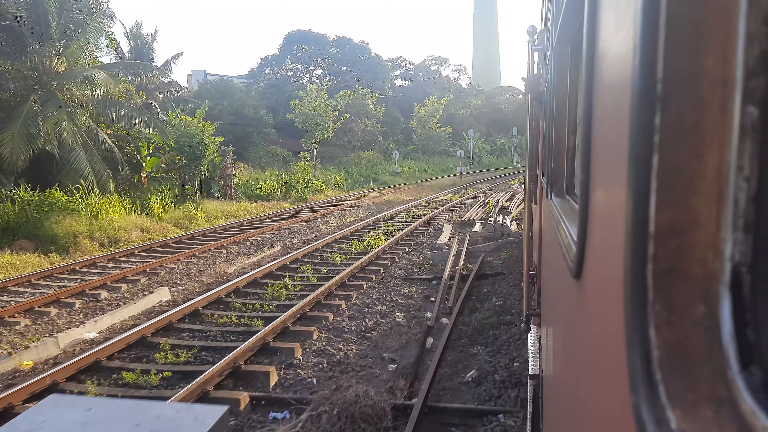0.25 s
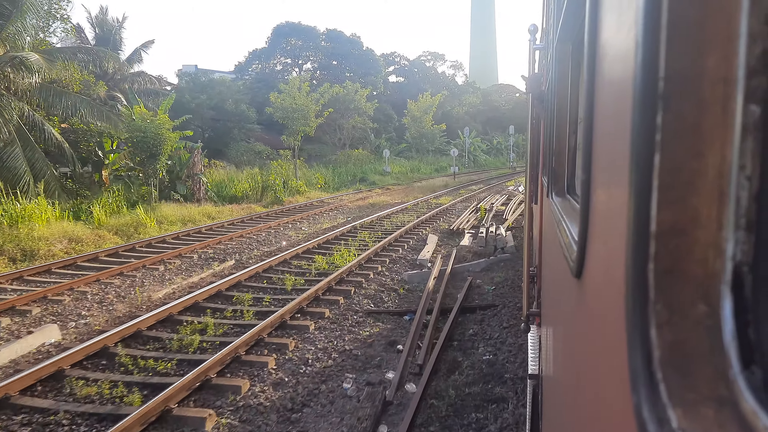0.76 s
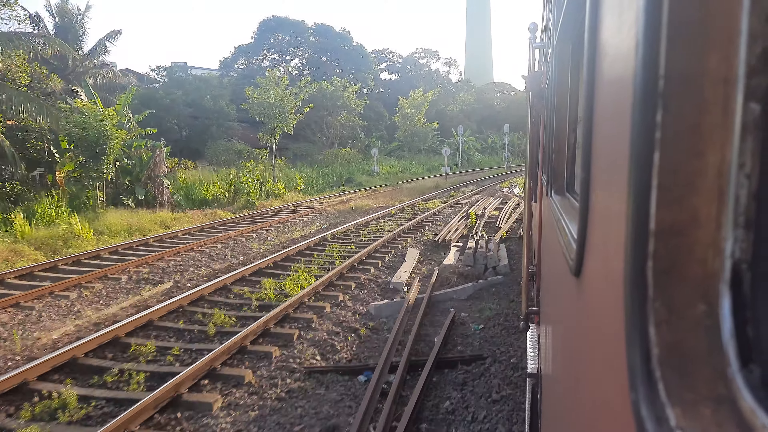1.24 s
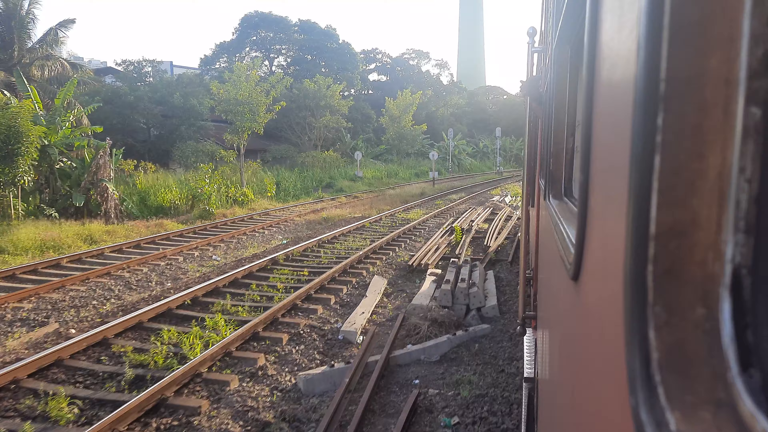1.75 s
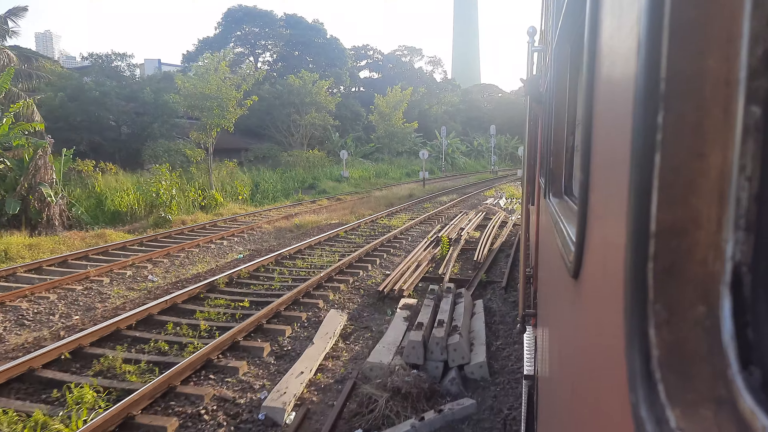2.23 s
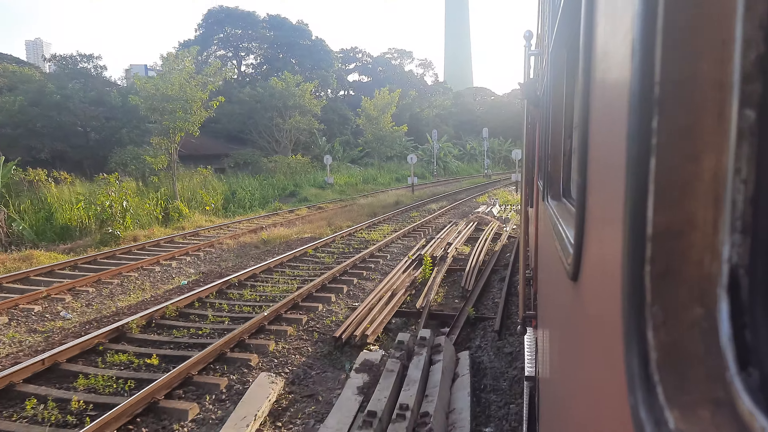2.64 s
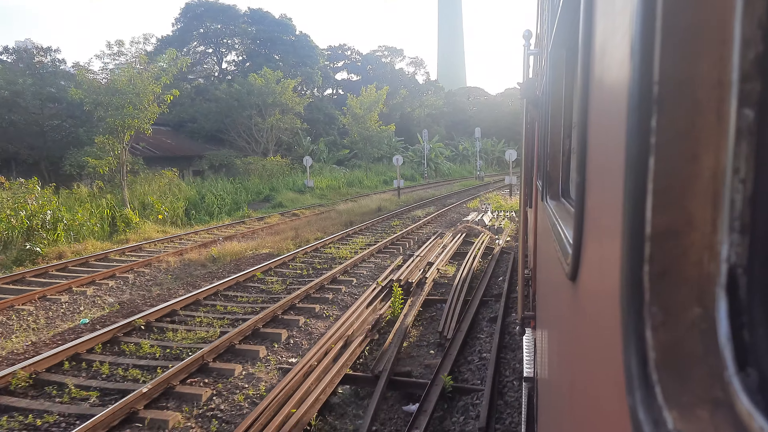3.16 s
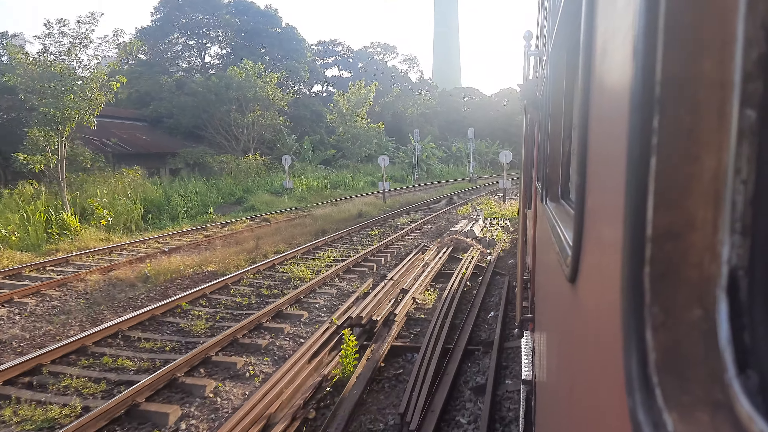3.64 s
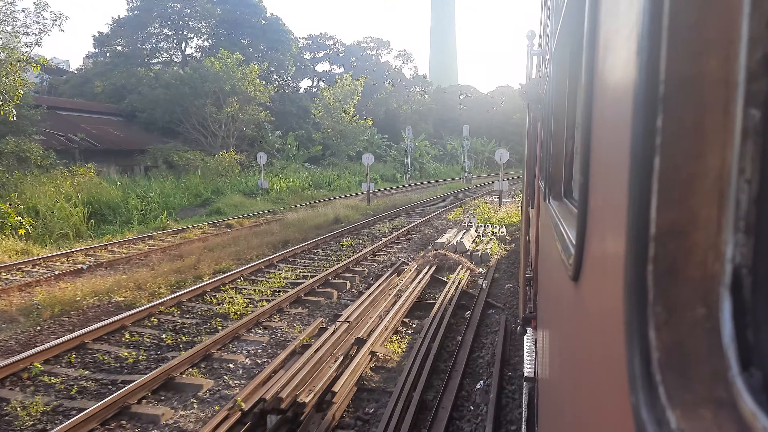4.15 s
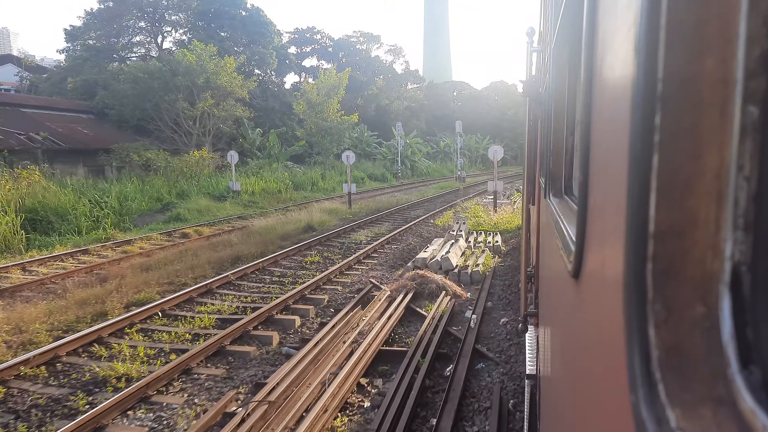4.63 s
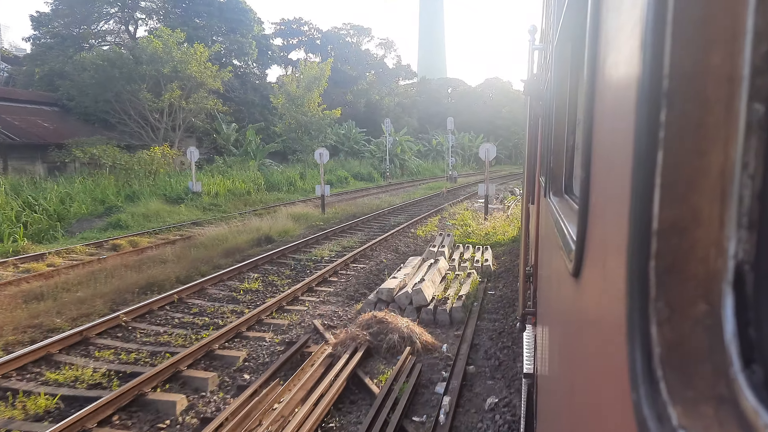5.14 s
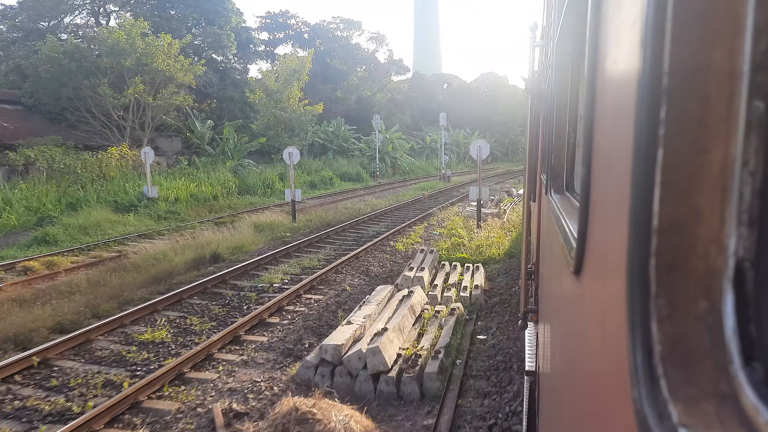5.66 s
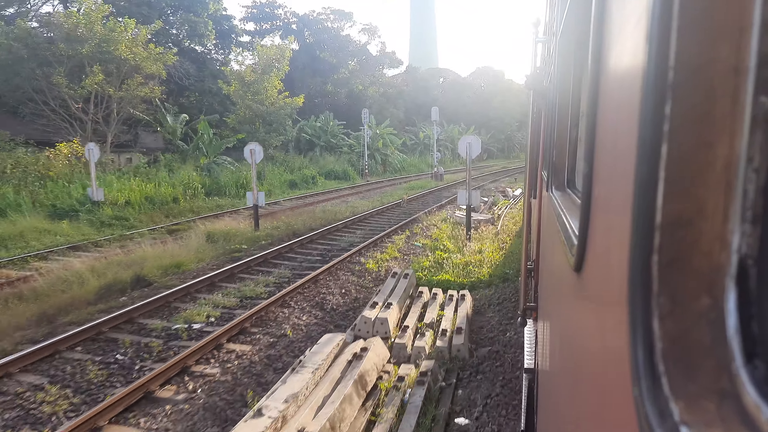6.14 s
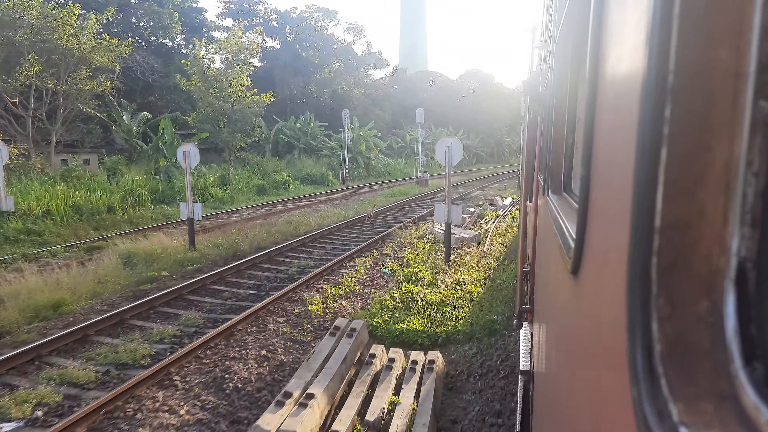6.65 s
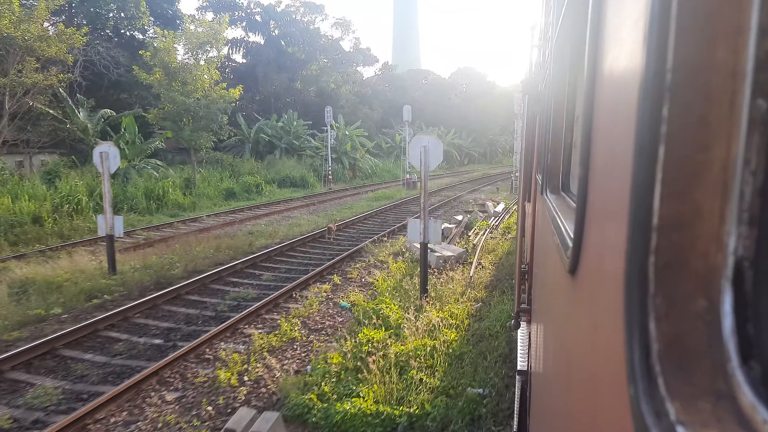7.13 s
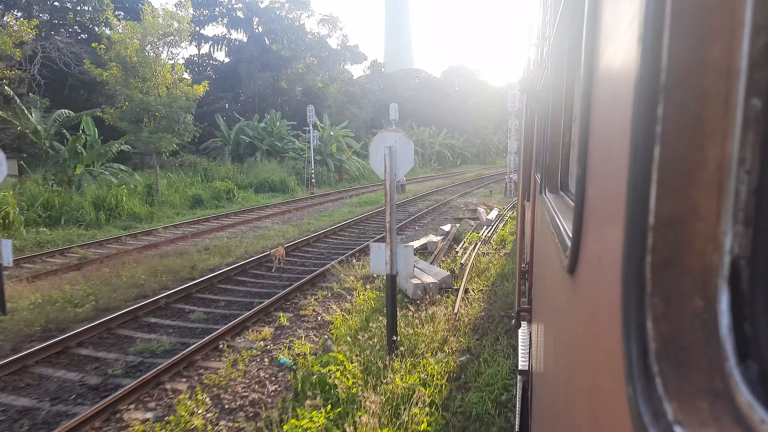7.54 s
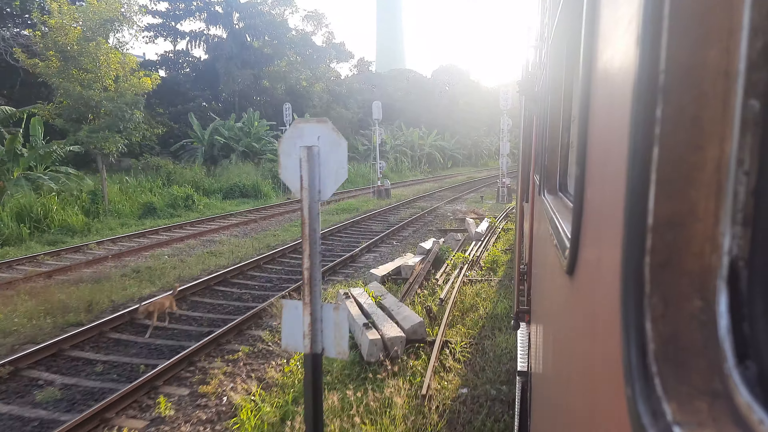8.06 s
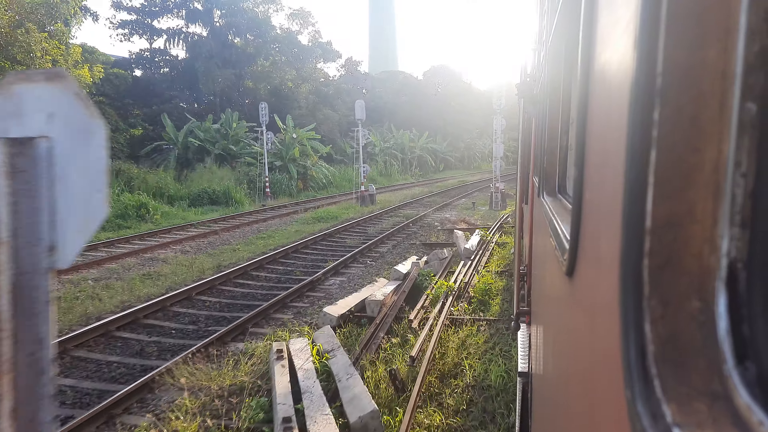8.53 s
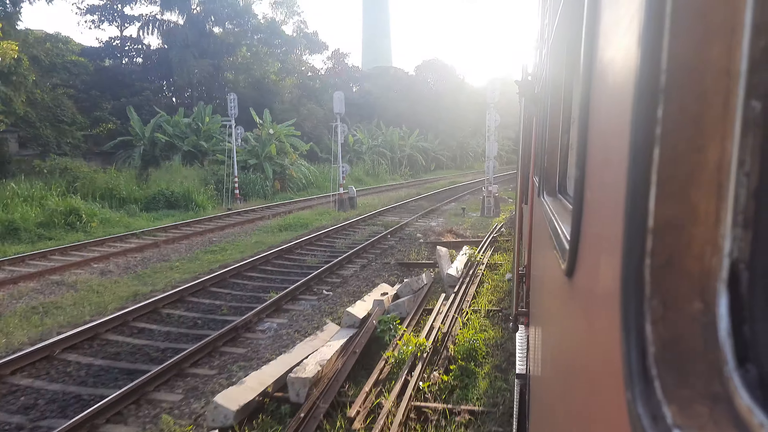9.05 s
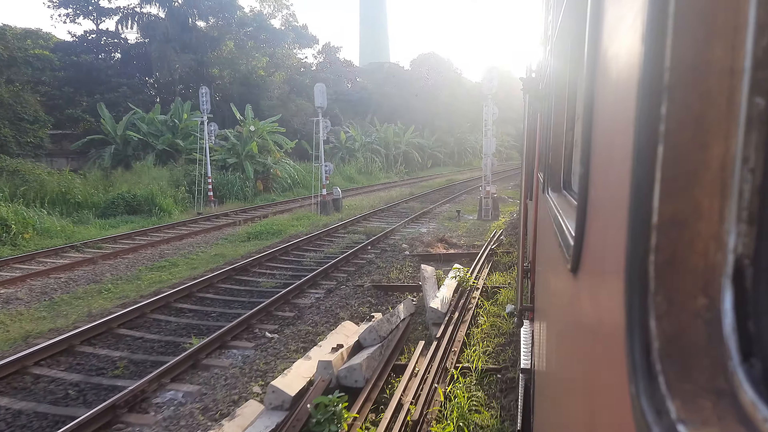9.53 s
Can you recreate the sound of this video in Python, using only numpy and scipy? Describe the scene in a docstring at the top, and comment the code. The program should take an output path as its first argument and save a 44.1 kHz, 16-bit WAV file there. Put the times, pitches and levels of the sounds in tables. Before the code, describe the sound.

A passenger train rolls slowly over jointed rails, heard closely from an open carriage door, outdoors in wide stereo. At 0 s the tail of a horn dies away over rough low rumble and faint steady far-wheel hiss. Dull, short, damped knocks come irregularly throughout, strong around 0.7 and 0.9 s, with small bursts of flange scraping. From about 2.5 to 3.7 s a wheel rubs continuously, a bright, gritty, ringing metallic hiss, while the rumble eases. Shorter scrapes and thin singing tones follow from 4.3 to 5.7 s. Heavy knocks gather between 5.2 and 7.4 s; around 6.6 to 6.9 s a coupling creaks in three wavering pulses. Flange hiss swells again at 7.7 s, and a mid-pitched, slightly wavering horn ahead blows from 7.8 to 8.2 s, then fades. Knocks, light rasping and a strengthening rumble continue until the cut at about 9.8 s.

```python
"""A passenger train rolls slowly over jointed rails and points, heard from an open carriage door.
The carriage is rumbling filtered noise, and each joint adds a short damped knock. Wheel flanges rub
the rail: noise rings the wheel modes in bursts of hiss. Single modes sing out as narrow noise tones.
A coupling creaks in wavering partials, and so does the horn ahead: first the tail of one blast,
later a whole one. The far wheels hiss steadily behind it all."""
import sys
import numpy as np
from scipy import signal
from scipy.fft import rfft, irfft
from scipy.io import wavfile
from scipy.ndimage import uniform_filter1d

SR = 44100
rng = np.random.default_rng(int(sys.argv[2]) if len(sys.argv) > 2 else 0)


def boost_factor(decibels):
    """Convert a level in decibels to a linear amplitude factor."""
    exponent = np.asarray(decibels, float) / 20
    return 10 ** exponent


def store_pcm(level_fs):
    """Save levels as 16-bit WAV."""
    pcm = np.round(np.clip(level_fs, -1, 1) * 32767).astype(np.int16)
    wavfile.write(sys.argv[1], SR, np.atleast_2d(pcm).T)


N = 431738   # length in samples

# carriage on the rails: t/s, rumble level/dB before each register's own offset,
# how much more the body drums than the underframe booms/dB
ROLLING = [(0.0, -26, -1), (0.57, -32.5, -4), (0.98, -27.5, 3), (1.45, -28.5, -11), (1.61, -25, -8),
           (1.85, -30.5, -1), (2.7, -34.5, -6.5), (3.57, -31.5, 4), (3.79, -29.5, 2), (4.71, -31.5, 0.5),
           (5.31, -26.5, 3.5), (7.28, -24, -1.5), (7.55, -29, -8.5), (7.74, -29, -5), (7.99, -30.5, -4.5),
           (9.38, -24.5, 2), (9.57, -26.5, 5), (9.79, -24, 0)]
# colour of underframe, body and wheel roar: f/Hz, relative level per Hz/dB
UNDERFRAME_COLOUR = [(15, -47), (25, -13), (92, 1), (170, -8.5), (220, -52), (370, -120)]
BODY_COLOUR = [(88, -5), (150, -12), (167, -3), (286, -1.5), (361, -9), (470, -16.5), (610, -15.5),
               (1030, -120)]
ROAR_COLOUR = [(250, -33), (430, 1), (813, -6.5), (918, -4.5), (1400, -17.5), (1710, -11), (2000, -19.5),
               (2600, -18), (4400, -120)]
# wheels knocking over joints: t/s, knock level/dB before a common trim, ring f/Hz,
# level of the shudder after the knock/dB, length of the shudder/s
JOINT_KNOCKS = [(0.125, -10, 111, -30, 0.024), (0.229, -32, 91, -29, .03), (0.31, -17, 220, -34, 0.031),
                (0.524, -18, 96, -18.5, 0.019), (0.688, -9.5, 229, -26.5, 0.1), (.82, -27, 91, -25, 0.072),
                (0.894, -7, 175, -24, .12), (0.994, -28, 131, -32, 0.036), (1.122, -11, 163, -20, 0.11),
                (1.22, -27, 100, -33, 0.035), (1.355, -21, 153, -27, 0.14), (1.45, -28, 112, -17, 0.09),
                (1.62, -34, 100, -21.5, 0.16), (1.71, -22, 188, -19, 0.064), (1.928, -41, 109, -33, 0.044),
                (2.009, -45, 104, -24, 0.084), (2.107, -20, 168, -23.5, 0.077),
                (2.309, -23, 232, -33, 0.087), (2.4, -14, 99, -24, 0.035), (2.492, -16, 105, -38, .03),
                (2.586, -17, 186, -28, 0.069), (2.85, -31, 89, -34, .04), (3.109, -19, 80, -30, .03),
                (3.172, -16.5, 186, -30, .04), (3.253, -15, 125, -33, .04), (3.346, -21, 97, -25, 0.036),
                (3.578, -21, 147, -18, 0.024), (3.694, -23, 232, -17, 0.028), (3.77, -34, 200, -25, 0.022),
                (3.85, -9, 223, -19.5, 0.042), (3.997, -14, 327, -26, 0.023),
                (4.109, -15.5, 330, -22.5, 0.12), (4.223, -20, 245, -19.5, 0.031),
                (4.417, -8, 173, -18, 0.029), (4.615, -18, 284, -23.5, 0.06), (4.863, -40, 83.4, -28, 0.13),
                (5.081, -13, 95.5, -41, .05), (5.234, -6.5, 143, -24.5, 0.062),
                (5.294, -9.5, 217, -20.5, 0.099), (5.43, -13, 119, -35, .04), (5.541, -12, 227, -20, 0.023),
                (5.66, -27, 139, -21.5, 0.065), (5.788, -13, 200, -20.5, 0.064),
                (5.886, -8.5, 129, -27, .05), (6.34, -26, 232, -40, 0.037), (6.488, -10.5, 258, -37, 0.03),
                (6.637, -8, 250, -22.5, 0.18), (6.79, -9, 117, -17.5, 0.035), (6.86, -15, 252, -21, .04),
                (6.98, -32, 95, -17.5, 0.024), (7.075, -6.5, 219, -24, 0.028),
                (7.12, -13.5, 100, -34, 0.026), (7.205, -10, 225, -20.5, 0.084),
                (7.29, -29, 180, -19, 0.028), (7.383, -6.5, 310, -20, 0.1), (7.733, -24, 107, -26, 0.045),
                (8.366, -15, 200, -17, 0.034), (8.484, -25, 189, -18, 0.12), (8.733, -19, 185, -18, 0.024),
                (8.783, -31, 103, -18, 0.11), (8.982, -16, 99.6, -30, 0.061), (9.06, -7, 180, -23.5, 0.11),
                (9.331, -9.5, 224, -19.5, 0.3), (9.53, -11, 244, -34, 0.071), (9.59, -30, 100, -16, 0.028),
                (9.64, -20, 267, -18, 0.11), (9.73, -18, 160, -18.5, 0.046)]
# ringing modes of three wheels: f/Hz, width/Hz before widening, relative level/dB
NEAR_WHEEL_MODES = [(1764, 50, -0.5), (2573, 107, -1.5), (3000, 95, -12), (3387, 92, -5.5), (4235, 100, -6),
                    (5127, 103, -5), (6022, 106, -1), (6860, 130, -8), (7730, 130, -4.5), (8550, 62, -9.5),
                    (9460, 190, -21.5), (10200, 180, -16), (11060, 99, -13.5), (12000, 110, -5.5),
                    (13350, 84, -7.5), (13800, 63, -14)]
SECOND_WHEEL_MODES = [(1727, 50, -6.5), (2133, 16, 0.5), (2573, 36, -4), (3470, 88, -10.5),
                      (3930, 59, -9.5), (4390, 69, -3.5), (5260, 73, -3.5), (6235, 48, -0.5),
                      (7140, 72, -2.5), (7947, 140, -5.5), (9660, 130, -7), (10700, 87, -10),
                      (11600, 160, -7), (12800, 120, -16)]
THIRD_WHEEL_MODES = [(1994, 120, 7), (2500, 90, -3), (2830, 120, -4), (3320, 26, -21), (3790, 24, -4.5),
                     (4590, 55, -4.5), (4760, 55, -8.5), (6000, 71, -1.5), (6750, 170, -3.5),
                     (7890, 140, 0), (11700, 34, -19)]
# flange touches, one list for each of the three wheels: start t/s, end t/s, start level/dB,
# end level/dB, weight of the low modes/dB
FLANGE_CONTACTS = [
    [(.092, .14, -17, -23, -7), (.2305, .32, -19, -24.5, -7), (.5176, .53, -12, -23.5, -10),
     (1.1403, 1.16, -25, -35, -4), (1.4541, 1.48, -22.5, -29.5, -5), (2.4594, 2.72, -17.5, -21.5, -2.5),
     (2.72, 3.32, -21, -20.5, -3.5), (3.32, 3.7, -18, -20.5, -5.5), (5.055, 5.13, -19.5, -23, -3),
     (5.2294, 5.27, -28.5, -27, -0.5), (5.2894, 5.35, -23, -24.5, 3), (5.4094, 5.5, -19.5, -18, -7),
     (5.53, 5.75, -27, -49, -7), (7.702, 7.76, -21, -18, -4.5), (7.76, 8.26, -19, -25, -4),
     (8.26, 8.6, -27.5, -27, -12)],
    [(0, .07, -22, -27, -9), (1.26, 1.29, -33, -37, -8), (2.143, 2.24, -29, -23.5, 0),
     (2.24, 2.45, -36, -26.5, -0.5), (4.2792, 4.4, -25.5, -29, -4), (4.4, 4.8, -25.5, -39.5, -3.5),
     (6.08, 6.25, -31, -46, -8), (7.1, 7.28, -31, -31.5, -2.5), (8.9494, 9.16, -24.5, -21, -3.5),
     (9.16, 9.38, -29.5, -22, -5.5)],
    [(.678, .73, -27, -27.5, -6), (.73, .87, -21.5, -26.5, -5), (6.0694, 6.2, -29.5, -28.5, -3),
     (6.62, 6.95, -31, -46.5, 5.5), (6.95, 7.4, -36, -42, -0.5), (8.6557, 8.71, -18, -17.5, -15.5),
     (9.54, 9.79, -30, -29, -3)],
]
# light rubbing that never stops: t/s, level/dB before it is shared between the wheels,
# weight of the low modes/dB, plain rasp against ringing/dB
LIGHT_RUBBING = [(0, -31.5, 4.5, 10), (.15, -33.5, -7, -7.5), (.64, -41, -6, 6), (.95, -35.5, -5, 7),
                 (1.25, -41, -2.5, 0), (1.6, -37, 2, 4), (1.95, -48, -5, -4), (2.15, -37.5, 1, 3),
                 (2.5, -27, -3, -3.5), (3.7, -34, -15, -2), (3.9, -35.5, -3, -8), (4.1, -34, -13.5, -5),
                 (4.3, -34.5, 3.5, 1), (5.03, -40, -16, -4), (5.5, -36, -13, 3), (5.92, -47, 8, 4),
                 (6.3, -39.5, 3, 3), (7.3, -34, -2, 2), (7.66, -45.5, -6, 3.5), (8.15, -27.5, -2.5, -1.5),
                 (8.85, -31.5, -3, 7), (9.2, -35.5, -1, 0), (9.79, -36, -11, 11.5)]
# colour of the plain hiss between the modes: f/Hz, relative level per Hz/dB
RASP_COLOUR = [(700, -13.5), (1400, -17.5), (2300, -13), (3700, -20.5), (5600, -8), (8100, 1.5), (9200, -4),
               (10000, -2), (11200, 4.5), (13000, 7.5), (14500, 1), (17000, 10.5)]
# modes of wheels and frame that can lock into a narrow tone: f/Hz
SINGING_MODES = (97, 290, 510, 870, 920, 955, 1010, 1650, 1735, 1997, 2600, 3410, 3985, 4270, 4385, 4680,
                 6000)
# when they sing, one list per mode: start t/s, end t/s, level/dB before evening and fades, width/Hz
SINGING_TIMES = [
    [(1.42, 1.66, -20, 14), (6.8, 7.05, -31, 15), (8.74, 8.92, -21.5, 33)],
    [(3.98, 4.06, -27, 50), (4.56, 4.7, -26.5, 45), (9.4, 9.75, -25.5, 60)],
    [(3.68, 3.796, -24.5, 73)],
    [(7.848, 8.26, -28.5, 50)],
    [(2.802, 3.04, -31.5, 34.5)],
    [(.04, .4, -45, 50), (4.385, 4.68, -42, 25)],
    [(7.45, 7.653, -46, 30)],
    [(.09, .14, -35, 39), (3.2, 3.69, -33, 13)],
    [(4.296, 4.52, -31.5, 32.4), (5.41, 5.52, -23.5, 30)],
    [(6.576, 6.8, -22.5, 20), (6.8, 7.0, -35.5, 18), (7.199, 7.367, -35.5, 49)],
    [(4.3, 4.6, -33.5, 40), (5.06, 5.22, -33, 50), (5.49, 5.7, -37.5, 55), (8.1, 8.5, -31, 60)],
    [(.09, .136, -27, 80), (4.3, 4.6, -41, 46.3), (5.06, 5.18, -33.5, 46.3), (5.3, 5.38, -35, 53),
     (5.5, 5.74, -43, 50.93)],
    [(.72, .9, -33, 160), (6.6, 6.9, -37, 45)],
    [(1.5, 1.77, -39, 50), (8.648, 8.75, -27, 90)],
    [(2.274, 2.5, -39, 60), (8.97, 9.45, -32, 75.6)],
    [(6.55, 7.4, -47, 60)],
    [(5.514, 5.814, -40, 60)],
]
# pulses of the coupling creak: start t/s, end of the strain t/s, level/dB before the partial's own,
# dying away/(dB/s), reference partial f/Hz
CREAK_PULSES = [(6.587, 6.644, -27, 130, 798), (6.718, 6.8, -31, 200, 780), (6.88, 6.943, -35.5, 104, 774)]
# multiple of the reference partial, relative level/dB
CREAK_PARTIALS = [(1, 0), (1.5, -4), (2, -4), (3, -9), (3.5, -8), (4, -9), (4.5, -14)]
# extra brightness of each creak pulse: dB per step of 1 in the multiple, away from the reference
CREAK_BRIGHTNESS = (-3.5, -4, -38)
# horn blasts: start t/s, end of the blowing t/s, level/dB before the partial's own, dying away/(dB/s)
HORN_BLASTS = [(-.05, 0.037, -26, 90), (7.79, 8.223, -27.5, 32)]
# partials of the fading and of the whole blast: multiple of the reference partial, relative level/dB
FADING_HORN_PARTIALS = [(1, -4), (1.5, -20)]
WHOLE_HORN_PARTIALS = [(.5, -1), (1, 3), (1.5, -5.5), (2, -25), (2.5, -24), (3, -30)]
# colour of the far wheels' hiss: f/Hz, relative level per Hz/dB
FAR_WHEEL_COLOUR = [(900, -14), (1300, -14.5), (2000, -2.5), (3000, -3.5), (4500, -5.5), (6000, -4.5),
                    (8000, -7), (9000, -12), (12000, -10), (16500, -20)]
# how alike left and right are: f/Hz, likeness from 0 to 1
LEFT_RIGHT_LIKENESS = [(30, .72), (90, .88), (300, .74), (700, .66), (1400, .42), (3000, .3), (6000, .2),
                       (12000, .12)]


def rms_one(x):
    """Scale a sound to an average strength (rms) of 1."""
    return x / np.sqrt(np.mean(x ** 2) + 1e-20)


def in_time(rows):
    """Draw straight lines between table rows: one value per sample for each column."""
    s, *columns = np.transpose(rows)
    return [np.interp(np.arange(N) / SR, s, column) for column in columns]


def at_hz(points, hz):
    """Read a frequency table on a log-frequency axis."""
    table_hz, values = np.array(points).T
    return np.interp(np.log(hz), np.log(table_hz), values)


def drift(rate_hz):
    """Random wandering of spread 1: sparse noise smoothed twice, so only slow changes remain."""
    step = 40   # samples between the random draws
    r = np.exp(-2 * np.pi * rate_hz * step / SR)
    noise = rng.standard_normal(N // step + 2002)
    slow = signal.lfilter([1], [1, -2 * r, r * r], noise)[2000:]   # skip the settling
    return np.interp(np.arange(N) / step, np.arange(len(slow)), rms_one(slow))


def resonate(x, hz, width):
    """Two-pole resonance: lets through a band around hz, with gain 1 at its top."""
    r = np.exp(-np.pi * max(width, 2) / SR)
    poles = [1, -2 * r * np.cos(2 * np.pi * hz / SR), r * r]
    return signal.lfilter([(1 - r * r) / 2, 0, (r * r - 1) / 2], poles, x)


def resonate_twice(x, hz, width):
    """Two equal resonances in a row, which gives the band steeper sides."""
    return resonate(resonate(x, hz, width), hz, width)


def coloured(spectrum):
    """Two unrelated noises shaped by a spectrum that falls away steeply outside its ends; rms 1."""
    hz = np.maximum(np.fft.rfftfreq(N, 1 / SR), 1)
    octaves_below = np.maximum(np.log2(spectrum[0][0] / hz), 0)
    octaves_above = np.maximum(np.log2(hz / spectrum[-1][0]), 0)
    shape_db = at_hz(spectrum, hz) - 33 * (octaves_below + octaves_above)
    return rms_one(irfft(rfft(rng.standard_normal((2, N))) * boost_factor(shape_db), N))


def held(start, end, start_db, end_db, fall_db_per_s, rise):
    """Power of an event: a rise, a level sliding from start to end, then a steady fall."""
    t = np.arange(N) / SR
    first = max(round(start * SR), 0)
    last = round((end + 60 / max(fall_db_per_s, 20)) * SR)
    t = t[first:last]
    level_db = np.interp(t, [start, end], [start_db, end_db]) - fall_db_per_s * np.maximum(t - end, 0)
    out = np.zeros(N)
    out[first:last] = (boost_factor(level_db) * np.clip((t - start) / max(rise, 1e-4), 0, 1)) ** 2
    return out


def split(x):
    """Part the sound at 4500 Hz into its high and low modes, each scaled to rms 1."""
    filters = [signal.butter(4, 4500, side, fs=SR, output="sos") for side in ("high", "low")]
    return [rms_one(signal.sosfilt(sos, x)) for sos in filters]


def carriage():
    """Lumpy rumble in three registers; low knocks shake the underframe, higher ones the body."""
    deep_db, body_db, roar_db = -4.5, -2.5, -9   # offsets against the rumble
    roar_follows = 0.44   # share of the rumble's swing
    body_from_hz, blend_octaves, shudder_roar_db = 135, 1, -13.5
    rumble_db, drum_db = in_time(ROLLING)
    mean_db = rumble_db.mean()
    deep = boost_factor(rumble_db + deep_db - drum_db / 2) ** 2
    body = boost_factor(rumble_db + body_db + drum_db / 2) ** 2
    roar = boost_factor(roar_db + mean_db + roar_follows * (rumble_db - mean_db)) ** 2
    for s, _, hz, db, length in JOINT_KNOCKS:
        shudder = held(s, s + length, db, db - 4, 180, rise=0.0067)
        body_share = np.clip(0.5 + np.log2(hz / body_from_hz) / blend_octaves / 2, 0, 1)
        deep = deep + (1 - body_share) * shudder
        body = body + body_share * shudder
        roar = roar + boost_factor(shudder_roar_db) ** 2 * shudder
    shared_lumps = drift(50)
    out = 0
    for power, spectrum, lumpy_db in ((deep, UNDERFRAME_COLOUR, 1.5), (body, BODY_COLOUR, 2.5),
                                      (roar, ROAR_COLOUR, 2.5)):
        lumps = boost_factor(lumpy_db * (0.1 * shared_lumps + drift(16.4)))
        out = out + np.sqrt(power) * lumps * coloured(spectrum)
    return out


def knocks():
    """Each joint gives a short damped ring of the floor and a dull clack of filtered noise."""
    out = np.zeros((2, N + SR))
    t = np.arange(SR // 5) / SR
    rise = 1 - np.exp(-t / 0.0052)
    phases = rng.uniform(0, 2 * np.pi, (len(JOINT_KNOCKS), 2))
    for (s, db, hz, *_), phase in zip(JOINT_KNOCKS, phases):
        ring = np.sin(2 * np.pi * hz * t + phase[:, None]) * np.exp(-t / 0.017)
        clack = resonate(rng.standard_normal((2, len(t))), 540, 680) * boost_factor(1.5) * np.exp(-t / 0.023)
        first = round(s * SR)
        out[:, first:first + len(t)] += boost_factor(db - 2.5) * rise * (ring + clack)
    return out[:, :N]


def wheel(modes, rub, fade_db):
    """Rubbing noise rings every mode of a wheel; each mode swells and fades by itself."""
    widening = 1.44
    out = 0
    for hz, width, db in modes:
        fading = boost_factor(db + fade_db * drift(4.4))
        out = out + fading * resonate_twice(rub, hz, width * widening)
    return rms_one(out)


def flanges():
    """Each wheel rings and rasps while its flange touches the rail, then rings out."""
    bite_s, ring_out_db_per_s, flutter_db = 0.0075, 139, 0.5
    graze_db, graze_low_db, rasp_db = in_time(LIGHT_RUBBING)
    rub = rng.standard_normal((2, N)) * boost_factor(2.03 * drift(57))   # gritty contact
    flutter = boost_factor(flutter_db * drift(3.0))
    # each wheel gets a third of the light rubbing's power
    graze_high = boost_factor(graze_db) ** 2 / 3
    graze_low = boost_factor(graze_db + graze_low_db) ** 2 / 3
    ringing, total_power = 0, 0
    wheels = (NEAR_WHEEL_MODES, SECOND_WHEEL_MODES, THIRD_WHEEL_MODES)
    for contacts, modes in zip(FLANGE_CONTACTS, wheels):
        high, low = graze_high, graze_low
        for start, end, start_db, end_db, low_db in contacts:
            touch = held(start, end, start_db, end_db, ring_out_db_per_s, rise=bite_s)
            high = high + touch
            low = low + touch * boost_factor(low_db) ** 2
        power = np.array([high, low])
        parts = split(wheel(modes, rub, fade_db=3.0))
        ringing = ringing + sum(np.sqrt(p) * part for p, part in zip(power, parts))
        total_power = total_power + power
    rasp = sum(np.sqrt(p) * part for p, part in zip(total_power, split(coloured(RASP_COLOUR))))
    rough_rasp = boost_factor(rasp_db + 2.3 * drift(19)) * rasp
    return flutter * (ringing + rough_rasp) / np.sqrt(1 + boost_factor(rasp_db) ** 2)


def singing():
    """Narrow rough tones swell and fade; a locked mode holds its strength, so the level is evened."""
    out = np.zeros((2, N))
    for hz, times in zip(SINGING_MODES, SINGING_TIMES):
        for start, end, db, width in times:
            first, last = round(start * SR), min(round(end * SR), N)
            length = last - first
            ring = rms_one(resonate_twice(rng.standard_normal((2, SR)), hz, width))
            ring = ring[:, 2000:2000 + length]   # skip the build-up
            ring = ring / np.sqrt(uniform_filter1d(ring ** 2, size=600) + 0.026)
            out[:, first:last] += boost_factor(db) * signal.windows.tukey(length, 0.3) * ring
    return out


def tone(start, end, db, fall_db_per_s, hz, partials, attack, bright_db, dulls_db_per_s, wobble_db, jitter):
    """Wavering partials are held, then die away, those far from the reference fastest.
    Left and right hear them a little out of step."""
    tilt_db = bright_db - dulls_db_per_s * np.clip(np.arange(N) / SR - end, 0, 0.4)
    phase = 2 * np.pi * np.cumsum(hz * (1 + jitter * drift(29))) / SR
    sides = np.array([[1], [-1]])
    out = 0
    for k, partial_db in partials:
        wobble = wobble_db * np.array([drift(11), drift(40)])   # left, right
        waver = boost_factor(partial_db + tilt_db * abs(k - 1) + wobble)
        out = out + waver * np.sin(k * phase + rng.uniform(0, 3.4) + 0.082 * k * sides)
    return np.sqrt(2 * held(start, end, db, db, fall_db_per_s, rise=attack)) * out


def coupling_creak():
    """A strained coupling creaks in short pulses of wavering partials."""
    return sum(tone(*pulse, CREAK_PARTIALS, attack=0.022, bright_db=bright_db, dulls_db_per_s=50,
                    wobble_db=7.0, jitter=0.00143)
               for pulse, bright_db in zip(CREAK_PULSES, CREAK_BRIGHTNESS))


def horn_ahead():
    """The horn sounds steady wavering partials around 631.7 Hz that dull as they die away."""
    return sum(tone(*blast, 631.7, partials, attack=0.021, bright_db=5, dulls_db_per_s=105,
                    wobble_db=4.0, jitter=0.0032)
               for blast, partials in zip(HORN_BLASTS, (FADING_HORN_PARTIALS, WHOLE_HORN_PARTIALS)))


def far_wheels():
    """The far wheels blend into a steady hiss of coloured noise."""
    return boost_factor(-42) * coloured(FAR_WHEEL_COLOUR)


def stereo(pair):
    """The right side hears the first sound late, mixed with more of the unrelated one toward the treble."""
    lag_s = 0.00024
    hz = np.maximum(np.fft.rfftfreq(N, 1 / SR), 1)
    alike = np.clip(at_hz(LEFT_RIGHT_LIKENESS, hz), 0, 1)
    first, second = rfft(pair)
    late = first * np.exp(-2j * np.pi * hz * lag_s)
    right = alike * late + np.sqrt(1 - alike ** 2) * second
    return np.array([pair[0], irfft(right, N)])


def scene():
    """Add creak and horn to the rolling train, with the left side slightly louder."""
    rolling = carriage() + knocks() + flanges() + singing() + far_wheels()
    balance_db = np.array([[0.5], [-0.5]])   # left, right
    return (stereo(rolling) + coupling_creak() + horn_ahead()) * boost_factor(balance_db)


def top_cut(x):
    """Nothing passes above the cut-off."""
    return signal.sosfilt(signal.butter(12, 16760, fs=SR, output="sos"), x)


def record(dry):
    """The microphone drops the deepest bass; the loudest peaks are softly rounded, then the top is cut steeply."""
    low_cut_hz, top_cut_hz = 39, 15870
    dry = signal.sosfilt(signal.butter(2, low_cut_hz, "high", fs=SR, output="sos"), dry)
    dry = 0.9 * np.tanh(dry / 0.9)
    dry = signal.sosfilt(signal.ellip(12, 0.5, 60, top_cut_hz, fs=SR, output="sos"), dry)
    return top_cut(dry)


dry = scene()
out = record(dry)
store_pcm(out)
```